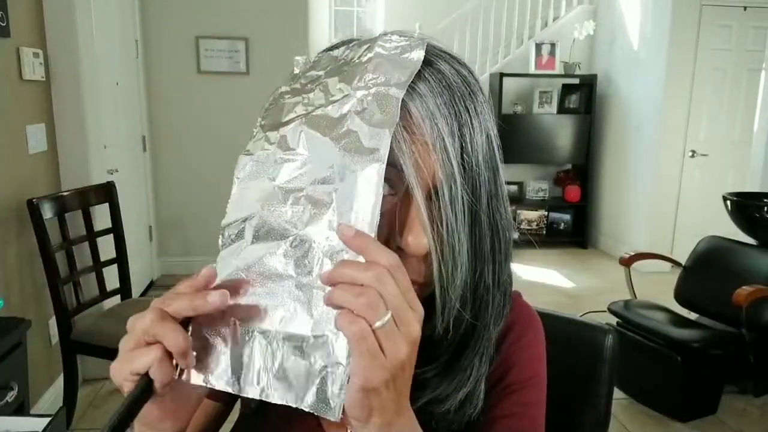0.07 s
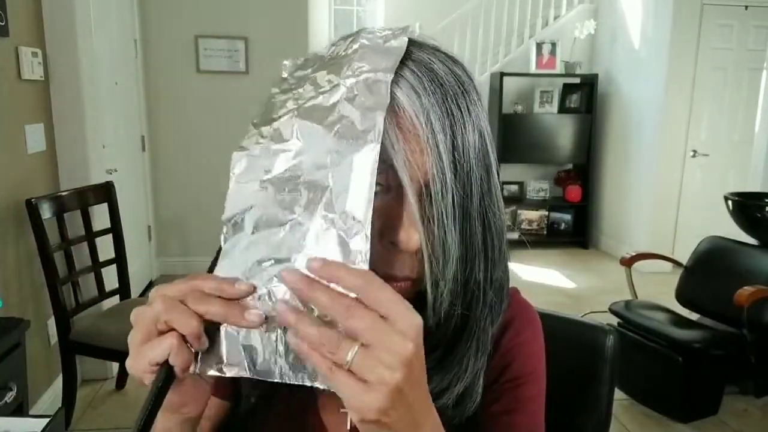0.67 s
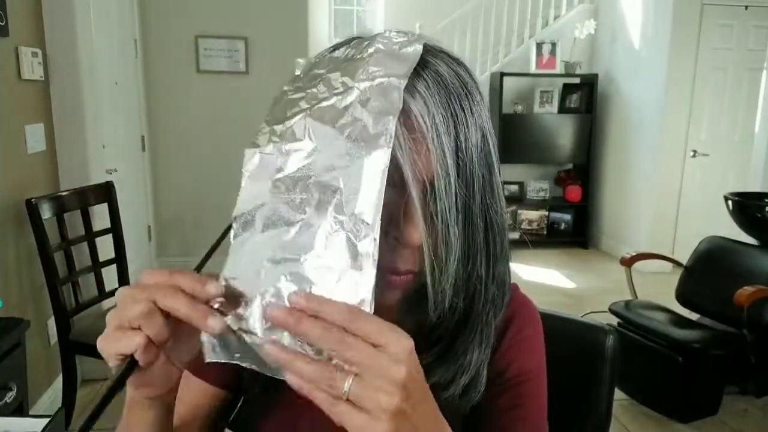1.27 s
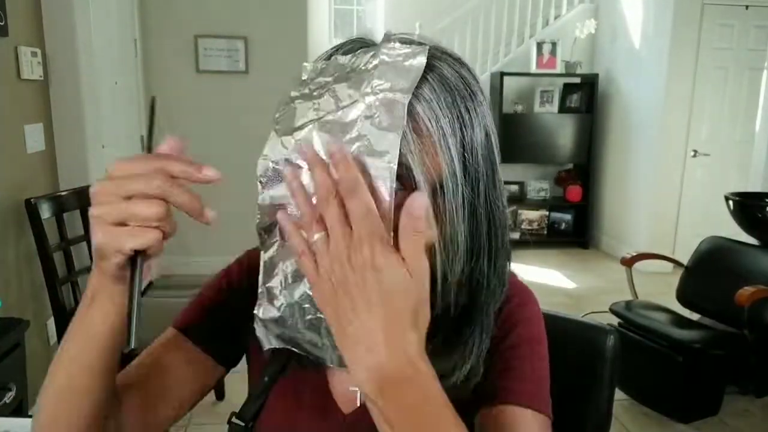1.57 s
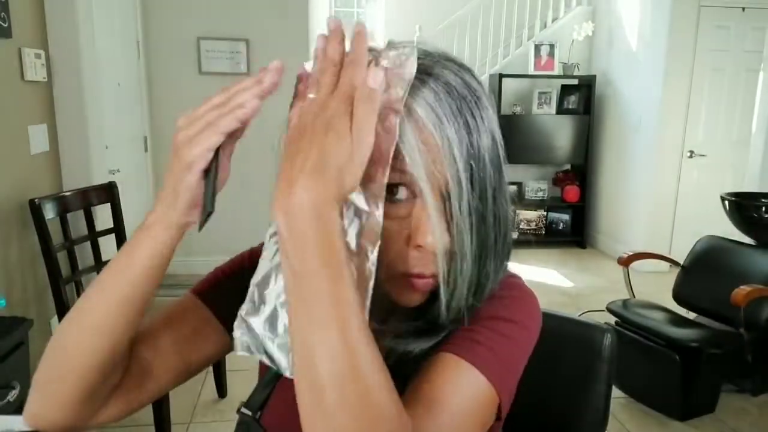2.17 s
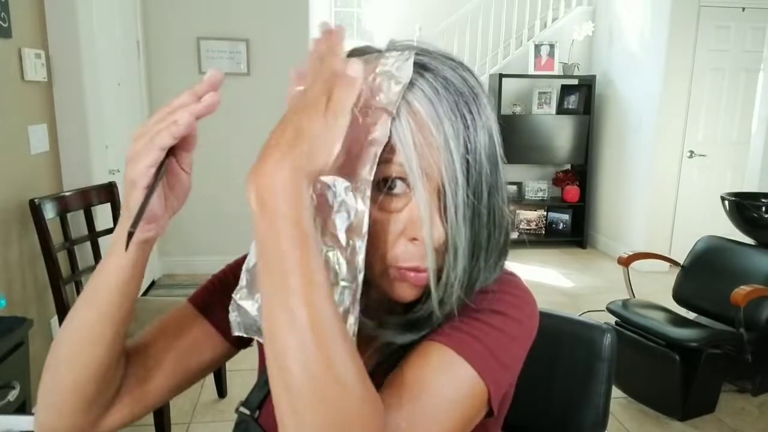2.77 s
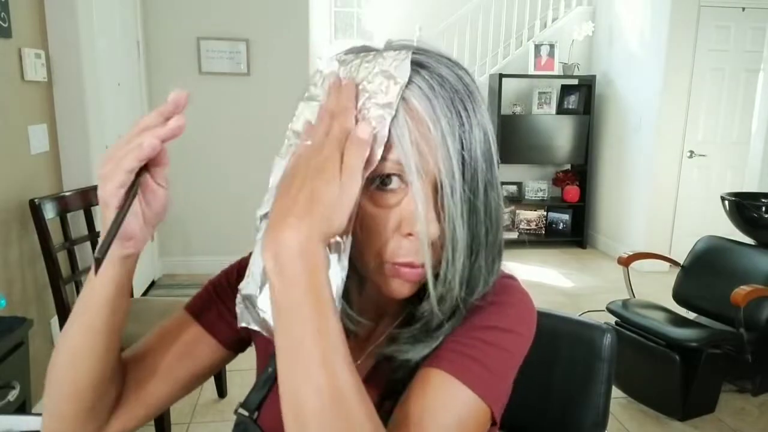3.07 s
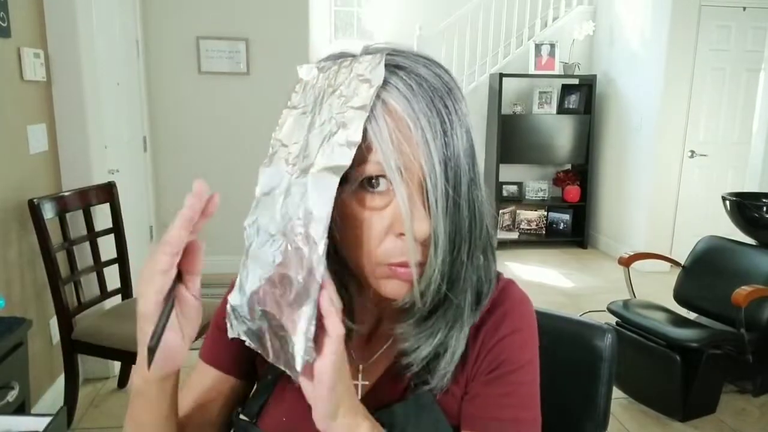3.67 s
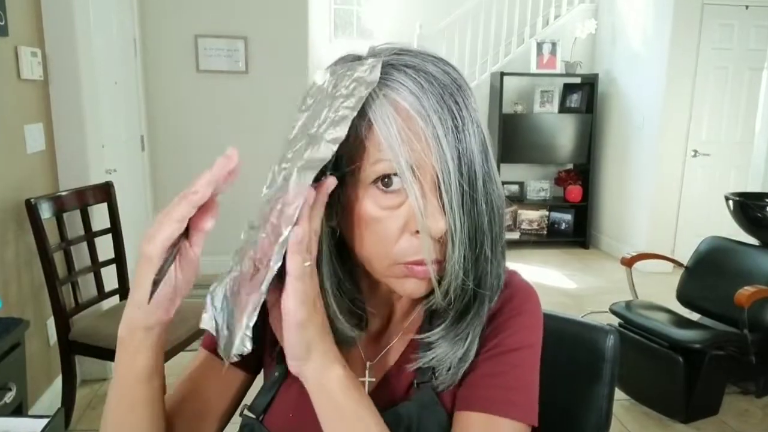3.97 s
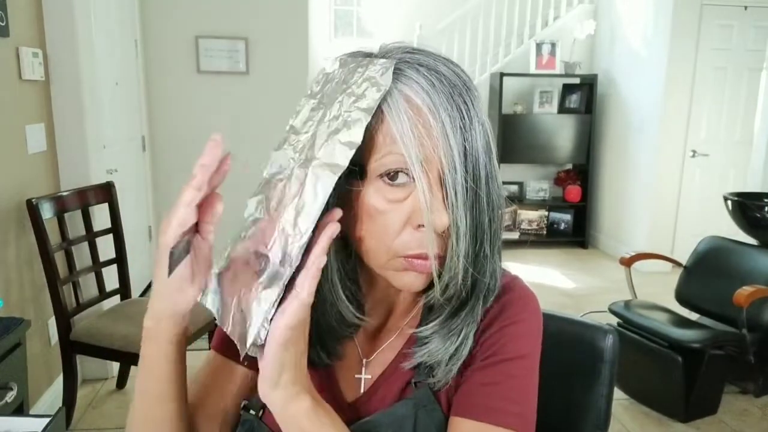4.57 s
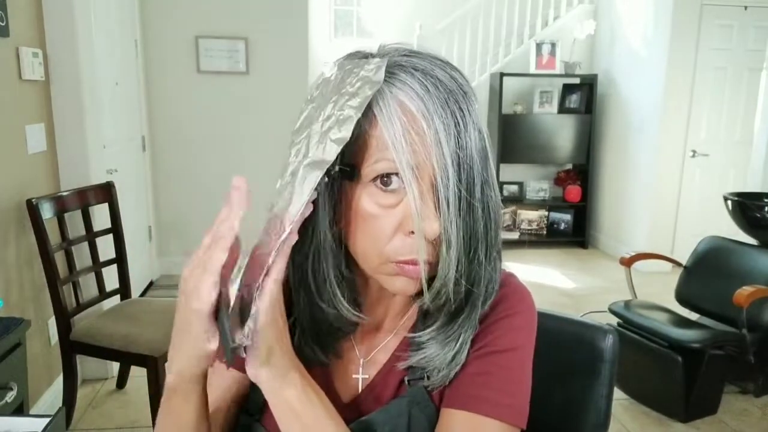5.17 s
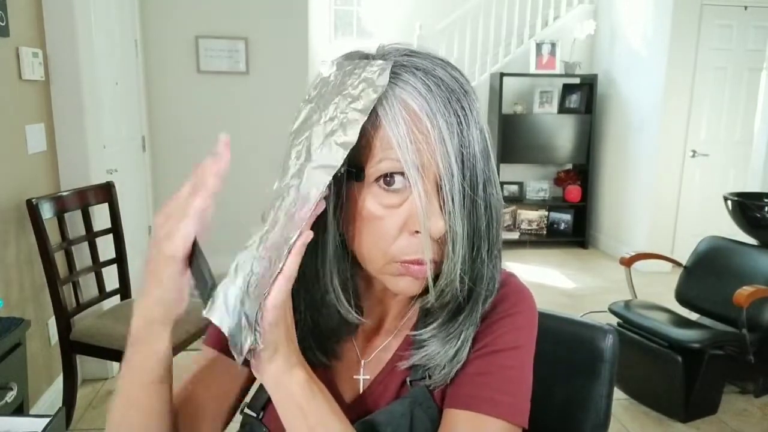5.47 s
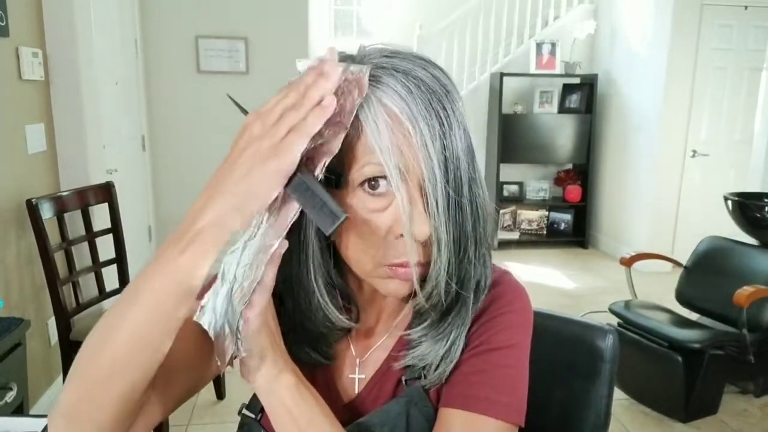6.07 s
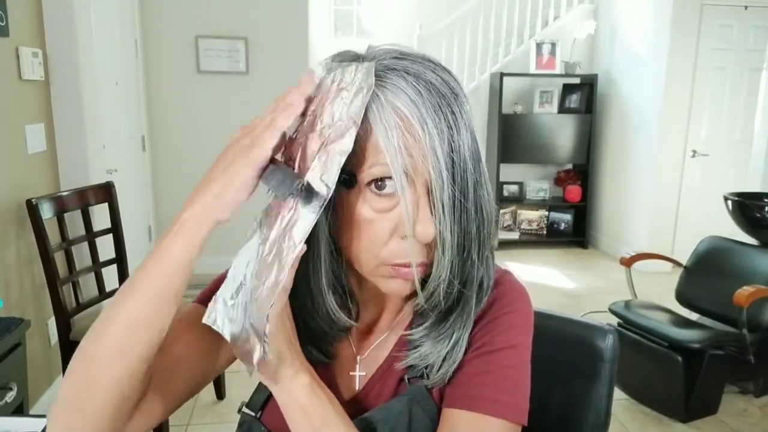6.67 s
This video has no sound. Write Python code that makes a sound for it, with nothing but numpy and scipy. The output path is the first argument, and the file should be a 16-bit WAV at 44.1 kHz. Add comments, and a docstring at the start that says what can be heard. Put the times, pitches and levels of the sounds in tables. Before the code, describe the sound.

From the start until about 1.5 seconds, hands fold aluminum foil close to the microphone. It gives a dense swarm of tiny bright clicks and sharp snaps, with lower rattles, pops and a few light knocks as the sheet buckles. After a brief lull, from about 1.8 to 3.2 seconds, the foil is patted and smoothed in separate crinkles, crisp snaps and soft palm swishes. It goes nearly quiet around 3.5 seconds. From about 3.7 seconds the crackling returns with gentle rubbing and a stronger crunch near 4.8 seconds. From 5 seconds to the end, near 7 seconds, short presses come closer together, with small knocks around 5, 6.3 and 6.7 seconds. The foil sits somewhat to the left, and each sound has a short room echo. A faint, low appliance hum continues throughout.

```python
"""An appliance hums low in a live room as hands fold aluminium foil over a lock of hair with a comb.
For the first second and a half, creases give way in swarms of tiny bright clicks, while the flat
panels between them buckle with a lower rattle and pop. Then the hands pat and smooth the packet:
scattered presses, sharp snaps, soft swishes of a palm. From about five seconds the presses come
closer together, a few with a knock, as the foil is pushed flat. The room answers each one."""
import sys
import numpy as np
from scipy import signal
from scipy.fft import rfft, irfft, next_fast_len
from scipy.io import wavfile
from scipy.ndimage import uniform_filter1d, map_coordinates

SR = 44100
rng = np.random.default_rng(int(sys.argv[2]) if len(sys.argv) > 2 else 0)


def master(y):
    """Save y as 16-bit WAV."""
    cut = np.clip(np.atleast_2d(y).T, -1, 1)
    pcm = np.round(cut * 32767)  # scale
    wavfile.write(sys.argv[1], SR, pcm.astype(np.int16))


N = 305172


def amp(db):
    """Decibels to gain."""
    return 10 ** (np.asarray(db) / 20)


def curve_at(points, hz):
    """Read a curve of (freq_hz, value) points on a log-frequency axis."""
    freqs, values = np.transpose(points)
    return np.interp(np.log(hz + 1), np.log(freqs), values)


def bell(hz, centre_hz, octaves):
    """An EQ bell on a log-frequency axis."""
    return np.exp(-(np.log2((hz + 1) / centre_hz) / octaves) ** 2 / 2)


def filtered(x, response):
    """EQ x with a gain given as a function of frequency."""
    size = x.shape[-1]
    padded = next_fast_len(size + 8192)
    return irfft(rfft(x, padded) * response(np.fft.rfftfreq(padded, 1 / SR)), padded)[..., :size]


def add(track, start_s, sound):
    """Mix a sound in at a time."""
    start = max(round(start_s * SR), 0)
    part = track[:, start:start + sound.shape[1]]
    part += sound[:, :part.shape[1]]


# How alike left and right are: freq_hz, correlation
STEREO_LIKENESS = [(100, 0.79), (500, 0.84), (1500, 0.41), (3000, 0.38), (6000, 0.039), (10000, 0.21),
                   (16000, -0.97)]
def stereo_noise(size):
    """Noise that is narrow in the bass, wide in the treble and out of phase at the very top."""
    def mid_side_gains(hz):
        angle = np.arccos(np.clip(curve_at(STEREO_LIKENESS, hz), -1, 1)) / 2
        return np.array([np.cos(angle), np.sin(angle)])
    mid, side = filtered(rng.standard_normal((2, size)), mid_side_gains)
    return np.array([mid + side, mid - side])


# Colour of the room air: freq_hz, gain_db
AIR_EQ = [(20, -18), (35, -28), (48, -16), (62, 3.5), (85, -11.5), (110, -9.5), (140, -10), (170, -21),
          (400, -30.5), (1000, -33.5), (3000, -38), (8000, -44), (11000, -30.5), (16000, -38)]
# Partials of the appliance hum: pitch_hz, level_db
HUM_PARTIALS = [(49.3, -55.5), (60, -70.5), (120, -78.5)]
def background(air_db):
    """A low appliance hum over faint room air."""
    t = np.arange(N) / SR
    air = filtered(stereo_noise(N), lambda hz: amp(curve_at(AIR_EQ, hz)))
    hum = sum(amp(db) * np.sqrt(2) * np.sin(2 * np.pi * (hz * t + rng.random()))
              for hz, db in HUM_PARTIALS)
    return hum + amp(air_db) * air / air.mean(0).std()


# Reverb time of the room by band: freq_hz, t60_s
ROOM_DECAY = [(200, 0.34), (1000, 0.34), (3000, 0.45), (8000, 0.37), (15000, 0.24)]
def room_tail(t):
    """Dense random room modes, each band dying at its own speed."""
    noise, tail = stereo_noise(len(t)), 0
    centres_hz = [hz for hz, _ in ROOM_DECAY]
    for weights, (_, t60) in zip(np.eye(len(ROOM_DECAY)), ROOM_DECAY):
        band = list(zip(centres_hz, weights))
        tail += filtered(noise, lambda hz: curve_at(band, hz)) * amp(-60 * t / t60)
    return tail


def room(foil, early_db, early_s, tail_db, spots=8):
    """Near surfaces answer first, then the whole room; each spot on the sheet has its own echoes."""
    t, wet = np.arange(SR // 2) / SR, np.zeros((2, N))
    active_spot = rng.integers(spots, size=N)[np.arange(N) // 220]  # drawn anew every 5 ms
    for spot in range(spots):
        early = stereo_noise(len(t)) * np.exp(-t / early_s)
        tail = room_tail(t) * (1 - np.exp(-t / 0.012))
        echo = sum(amp(db) * part / np.linalg.norm(part[0])
                   for db, part in ((early_db, early), (tail_db, tail)))
        send = np.sqrt(np.abs(uniform_filter1d(1. * (active_spot == spot), size=128)))
        add(wet, .003, signal.fftconvolve(foil * send, echo, axes=1))
    return wet


# Colour of the foil's flat panels, under rubs, pops and rattle alike: freq_hz, gain_db
PANEL_EQ = [(40, -26), (100, 1), (170, -16.5), (278, -10.5), (336, 2), (375, -13), (447, -17), (549, 5.5),
            (675, -7), (803, -0.5), (941, -6), (1120, -1.5), (1420, -1.5), (2250, -4), (6400, -15.5),
            (7500, -17), (9750, -18), (16500, -120)]
# Palm strokes over the sheet: peak_s, level_db, centre_hz, half_length_s
PALM_STROKES = [(1.151, -50, 540, 0.018), (1.398, -53, 1350, 0.0092), (1.887, -45, 1700, 0.011),
                (2.049, -57.5, 1670, 0.021), (2.31, -57.5, 2240, 0.031), (2.984, -45, 2200, 0.014),
                (3.95, -62.5, 2000, 0.12), (4.299, -62, 1740, 0.035), (4.42, -60, 1540, 0.01),
                (4.495, -54.5, 860, 0.031), (4.758, -54.5, 850, 0.032), (5.419, -57.5, 486, .025),
                (6.485, -48.5, 1320, 0.014), (6.726, -50.5, 1320, 0.01), (6.761, -49, 794, .027),
                (6.848, -57.5, 880, .017)]
def palm_rubs(gain_db, octaves, skirt_db, rough_db, slip_hz):
    """Skin slides on foil in small uneven slips: a grainy swish, tuned by the hollow under the palm."""
    track, t = np.zeros((2, N)), np.arange(-SR // 3, SR // 3) / SR
    for peak_s, db, centre_hz, half_length_s in PALM_STROKES:
        def colour(hz):
            return amp(curve_at(PANEL_EQ, hz)) * (bell(hz, centre_hz, octaves) + amp(skirt_db))
        swish = filtered(stereo_noise(len(t)), colour)
        slips = map_coordinates(rng.standard_normal(512), [(t - t[0]) * slip_hz], mode='wrap')
        swish *= amp(rough_db * slips)
        swell = np.exp(-(t / half_length_s) ** 2 / 2)
        add(track, peak_s + t[0], amp(db + gain_db) * swish / swish.mean(0).std() * swell)
    return track


def facet_clicks(eq, crack, accent_db, count, t60_s=0.036):
    """Facets of foil give way: unit-energy cracks that ring briefly, each with its own peak or notch."""
    size = 1024
    t = np.arange(size) / SR
    noise = stereo_noise(size * count).reshape(2, count, size).swapaxes(0, 1)
    bursts = noise * amp(-60 * t / t60_s) * (1 + crack * np.exp(-t / 0.00022))
    bursts = np.pad(bursts, ((0, 0), (0, 0), (64, 0)))  # space for the EQ's pre-ring
    hz = np.fft.rfftfreq(2 * size, 1 / SR)
    accent_hz = 1500 * 2 ** rng.standard_normal((count, 1, 1))
    colour = amp(curve_at(eq, hz) + accent_db * bell(hz, accent_hz, octaves=0.048))
    clicks = irfft(rfft(bursts, 2 * size) * colour)[..., :size]
    return clicks / np.linalg.norm(clicks.mean(1), axis=1)[:, None, None]


# A flat panel flips over: start_s, level_db, pitch_hz
PANEL_POPS = [(.333, -29, 603), (0.747, -39.5, 1400), (.951, -23, 1310), (2.33, -37.5, 3020),
              (3.167, -45.5, 2240), (4.164, -44.5, 1170), (4.964, -40.5, 1250), (5.725, -37, 1570),
              (6.095, -32, 1200), (6.479, -36.5, 1300), (6.717, -32.5, 1410)]
# A firm push knocks the whole packet: start_s, level_db
PACKET_KNOCKS = [(.333, -33.5), (.6, -40), (.937, -38.5), (1.126, -31), (5.036, -45.5), (6.285, -39.5),
                 (6.717, -29)]
# Low-mid ring of the room, with brief foil tones, after a firm push: pitch_hz, gain_db, t60_s
KNOCK_RING = [(336, -16.5, 0.25), (587, -7, 0.037), (673, -12.5, 0.087), (1347, -3.5, 0.027)]
def pops_and_knocks(rattle_gain, pop_t60_s):
    """A flipping panel swings briefly, a knock sets the room ringing; both shake the nearby facets."""
    track, t = np.zeros((2, N)), np.arange(SR // 6) / SR
    hits = [(start_s, db, [(hz, 0, pop_t60_s)]) for start_s, db, hz in PANEL_POPS]
    hits += [(start_s, db, KNOCK_RING) for start_s, db in PACKET_KNOCKS]
    rattles = facet_clicks(PANEL_EQ, crack=1.5, accent_db=-2, count=len(hits))
    attack = 1 - np.exp(-t / .0003)
    for (start_s, db, modes), rattle in zip(hits, rattles):
        ring = sum(np.sin(2 * np.pi * hz * t) * amp(mode_db - 60 * t / t60) for hz, mode_db, t60 in modes)
        add(track, start_s, amp(db) * ring[None] * attack)
        add(track, start_s, amp(db) * rattle_gain * rattle)
    return track


# Bright colour of snaps and crackle, including the microphone's treble lift above 9 kHz: freq_hz, gain_db
BRIGHT_EQ = [(600, -27.5), (2000, -11), (4000, -10), (6500, -12.5), (8000, -15.5), (9300, -5),
             (11500, -0.5), (13500, -2.5), (15500, -6.5), (16500, -17)]
# The loudest single creases snapping through: start_s, level_db
CREASE_SNAPS = [(.049, -30.5), (0.0792, -22.5), (0.24, -16.5), (.377, -21.5), (0.4542, -21.5), (0.539, -30),
                (0.7693, -35), (1.126, -24), (1.294, -27), (1.784, -26), (1.806, -28), (2.0422, -27.5),
                (2.068, -32), (2.1096, -32), (2.1443, -30.5), (2.562, -26.5), (2.9606, -22), (2.786, -40.5),
                (3.1278, -35.5), (3.167, -35), (3.713, -26), (4.044, -28), (4.1643, -36), (4.325, -30),
                (4.7382, -21), (4.911, -25.5), (4.9633, -28.5), (5.017, -27.5), (5.308, -27), (5.4374, -32),
                (5.568, -40.5), (5.703, -28), (5.714, -20), (5.7859, -31), (5.913, -19), (6.0773, -27),
                (6.271, -30), (6.284, -25.5), (6.575, -34), (6.6143, -37), (6.6648, -33.5), (6.6956, -28),
                (6.716, -25)]
def crease_snaps(gain_db, run_s, steps=4, step_drop_db=2.4):
    """A stiff crease lets go in a quick run of ever smaller steps."""
    track = np.zeros((2, N))
    clicks = facet_clicks(BRIGHT_EQ, crack=1, accent_db=0, count=len(CREASE_SNAPS) * steps)
    for (start_s, db), run in zip(CREASE_SNAPS, clicks.reshape(len(CREASE_SNAPS), steps, 2, -1)):
        for step, click in enumerate(run):
            delay_s = run_s * (step + rng.uniform(-0.24, 0.4)) / steps
            add(track, start_s + delay_s, amp(db + gain_db - step_drop_db * step) * click)
    return track


def crackle(level, eq, rate_hz, crack, accent_db, facets=220, spread_db=5.5, reference_db=-50.5):
    """A swarm of clicks, rate_hz at the reference level; more force gives more and bigger clicks."""
    clicks_per_s = rate_hz * (level / amp(reference_db)) ** .5
    sizes = amp(spread_db * np.clip(rng.standard_normal(N), -3, 2))
    sizes *= rng.random(N) < clicks_per_s / SR
    # neighbouring clicks share the strain that the hand puts in
    local_power = np.abs(uniform_filter1d(uniform_filter1d(sizes ** 2, size=500), size=500))
    gains = level * sizes / np.sqrt(local_power + 1e-9)
    # the hand travels, so only a few neighbouring facets are in play at a time
    facet = (np.arange(N) * facets // N + rng.integers(8, size=N)) % facets
    clicks, track = facet_clicks(eq, crack, accent_db, facets), np.zeros((2, N))
    for i in np.flatnonzero(gains):
        add(track, i / SR - .001, gains[i] * clicks[facet[i]])
    return track


def grip(t, start_s, end_s, attack_s=0.0114, release_s=0.03):
    """Envelope of a steady hold on the sheet: attack, hold, release."""
    return np.clip((t - start_s) / attack_s, 0, 1) * np.exp(-np.maximum(t - end_s, 0) / release_s)


def press(t, peak_s, rise_s, fall_s=0.015, settle_db=-18, settle_s=0.074):
    """Envelope of a push: it swells and lets go, then the crushed foil creeps back ever more faintly."""
    before, after = np.maximum(peak_s - t, 0), np.maximum(t - peak_s, 0)
    swell = np.exp(-(before / rise_s) ** 2 / 2)
    settling = amp(settle_db) * np.exp(-after / settle_s)
    return swell * np.hypot(np.exp(-after / fall_s), settling)


# The hands keep working the sheet: start_s, end_s, crease_db, panel_db
HAND_GRIPS = [(-.02, 0.05, -61, -62), (0.045, 0.198, -49, -57), (0.23, 1.39, -56.5, -58.5),
              (1.83, 2.172, -60.5, -69.5), (2.325, 2.756, -63, -70.5), (2.997, 3.18, -61.5, -69),
              (3.18, 3.44, -73.5, -82), (3.564, 3.67, -68, -79), (3.662, 3.89, -55, -62.5),
              (3.893, 4.324, -54.5, -63.5), (4.389, 4.539, -53, -57), (4.545, 4.71, -64.5, -68.5),
              (4.681, 5.166, -53.5, -59), (5.29, 5.41, -58, -60), (6.49, 6.606, -59, -63.5),
              (6.694, 6.92, -62.5, -68.5)]
# A hand crushes the sheet: peak_s, crease_db, panel_db, rise_s
HAND_PRESSES = [(0.194, -43.5, -54.5, 0.021), (0.316, -35, -45.5, 0.0069), (.342, -38, -40.5, 0.013),
                (0.376, -49.5, -46, .008), (0.457, -58, -49.5, .004), (.497, -47.5, -50, 0.0066),
                (0.547, -36.5, -42, 0.0054), (.605, -36, -41.5, 0.017), (0.771, -38.5, -41.5, 0.0038),
                (0.812, -45.5, -48, 0.0077), (0.936, -39, -42, 0.01), (.997, -42.5, -47, 0.0029),
                (1.13, -34, -38, 0.0056), (1.244, -47, -54, 0.0084), (1.405, -51, -57, 0.022),
                (1.818, -40.5, -43, 0.015), (1.871, -44.5, -51.5, 0.031), (1.915, -48.5, -48, 0.021),
                (2.259, -41, -47, 0.012), (2.334, -48.5, -59, 0.0078), (2.58, -44.5, -48, 0.0097),
                (2.965, -39.5, -45.5, 0.0072), (3.043, -50, -54.5, 0.014), (3.68, -53, -65.5, 0.015),
                (3.933, -50, -53, 0.024), (4.484, -47, -59, 0.0089), (4.775, -36.5, -39, 0.02),
                (5.04, -37, -37.5, 0.0062), (5.262, -37.5, -43.5, 0.012), (5.724, -40, -44.5, 0.0091),
                (5.927, -42.5, -45, 0.014), (6.095, -41.5, -50, 0.0087), (6.291, -39, -42.5, 0.0093),
                (6.483, -43.5, -53.5, 0.015), (6.726, -42.5, -46.5, 0.02)]
def crumpling(grip_crease_gain_db, grip_panel_gain_db, press_gain_db, stray_gain_db, fold_end_s):
    """Grips and presses make creases crackle and panels rattle; stray ticks stand out during the fold."""
    t = np.arange(0, N, 16) / SR
    grip_power = press_power = 0  # rows: creases, panels
    for start_s, end_s, crease_db, panel_db in HAND_GRIPS:
        gains = amp([crease_db + grip_crease_gain_db, panel_db + grip_panel_gain_db])
        grip_power += np.outer(gains, grip(t, start_s, end_s)) ** 2
    for peak_s, crease_db, panel_db, rise_s in HAND_PRESSES:
        gains = amp([crease_db, panel_db]) * amp(press_gain_db)
        press_power += np.outer(gains, press(t, peak_s, rise_s)) ** 2
    stray_power = grip_power[0] * (t < fold_end_s)
    crease, panel, stray = (np.interp(np.arange(N) / SR, t, np.sqrt(power))
                            for power in (*(grip_power + press_power), stray_power))
    return (crackle(crease, BRIGHT_EQ, rate_hz=700, crack=1.0, accent_db=-2.5)
            + crackle(panel, PANEL_EQ, rate_hz=700, crack=0.64, accent_db=11)
            + amp(stray_gain_db) * crackle(stray, BRIGHT_EQ, rate_hz=28, crack=1.5, accent_db=3))


def scene():
    """The foil, close by in its room, over the background."""
    foil = crumpling(grip_crease_gain_db=-2.5, grip_panel_gain_db=-4.0, press_gain_db=-0.5,
                     stray_gain_db=-2.0, fold_end_s=1.5)
    foil += crease_snaps(gain_db=1.0, run_s=0.0044)
    foil += pops_and_knocks(rattle_gain=2.17, pop_t60_s=0.011)
    foil += palm_rubs(gain_db=-2.5, octaves=0.3, skirt_db=-12, rough_db=3, slip_hz=110)
    wet = room(foil, early_db=-6, early_s=.014, tail_db=-6)
    return foil + wet + background(air_db=-65)


# Stereo balance of the microphones: freq_hz, left_minus_right_db
LEFT_LEAN = [(60, 3.5), (200, 5), (700, 5), (3000, 4.5), (8000, 11), (11000, 5.5), (14000, 12.5)]
HIGH_CUT_HZ = 15900
def record(dry):
    """The left microphone hears more, above all in the treble; a steep high cut trims the top."""
    def balance(hz):
        lean = amp(curve_at(LEFT_LEAN, hz))
        return 2 * np.array([lean, np.ones_like(lean)]) / (1 + lean)
    return filtered(filtered(dry, balance), lambda hz: hz < HIGH_CUT_HZ)


dry = scene()
out = record(dry)
master(out)
```